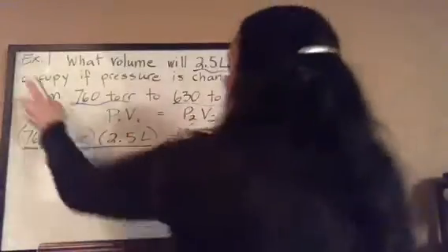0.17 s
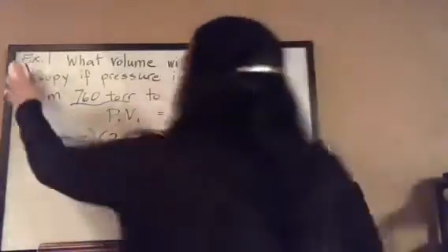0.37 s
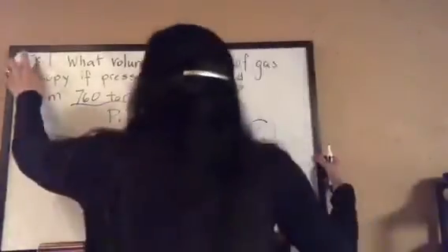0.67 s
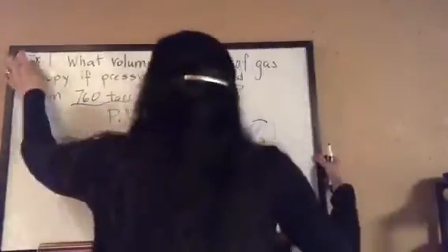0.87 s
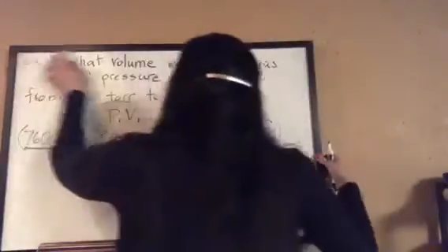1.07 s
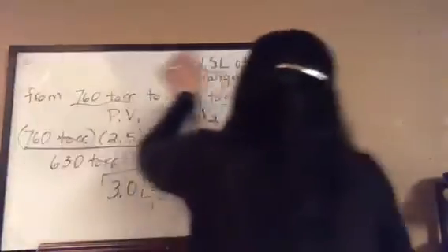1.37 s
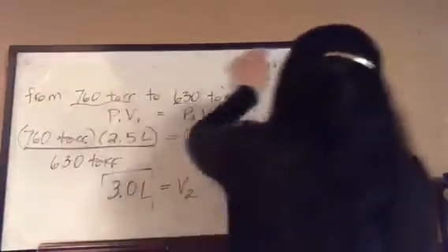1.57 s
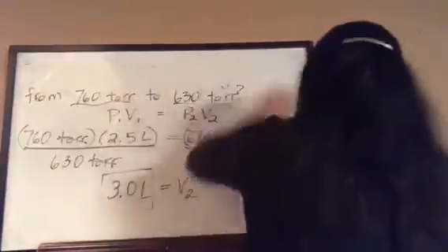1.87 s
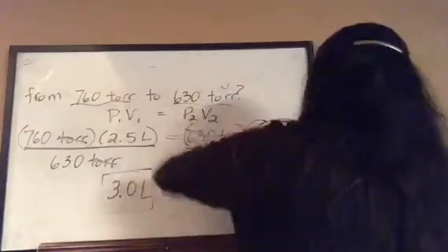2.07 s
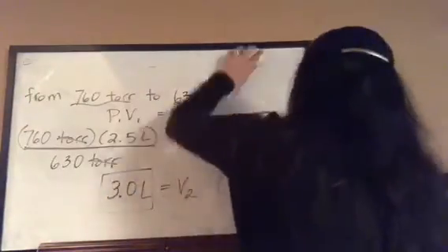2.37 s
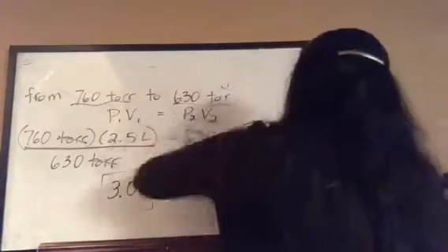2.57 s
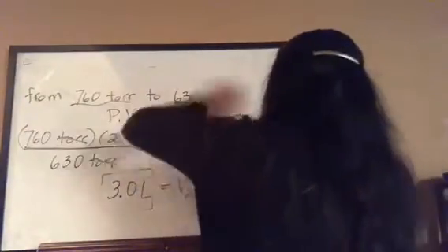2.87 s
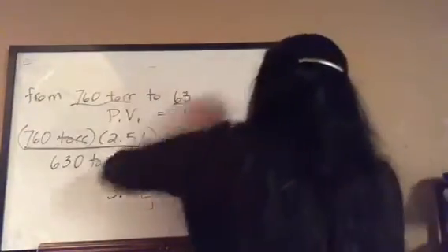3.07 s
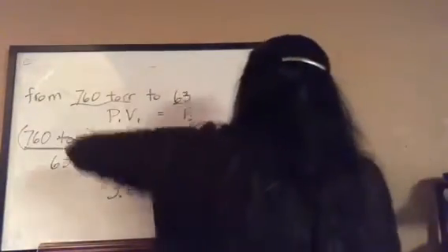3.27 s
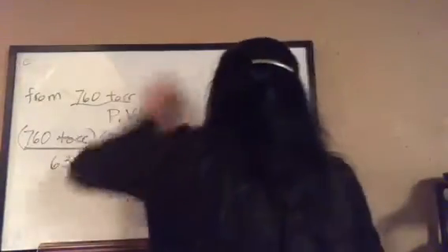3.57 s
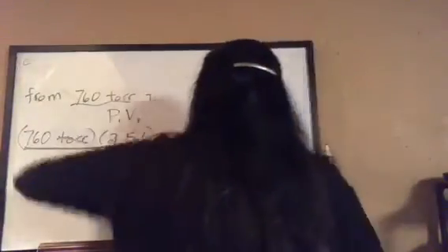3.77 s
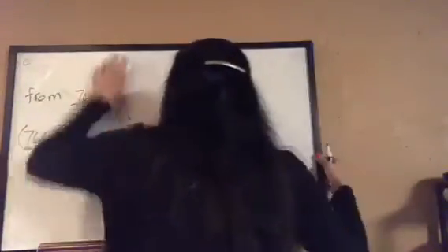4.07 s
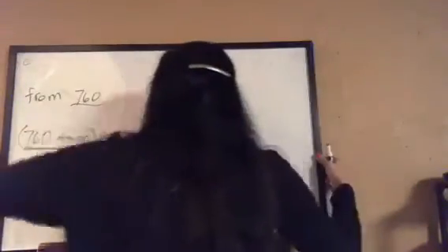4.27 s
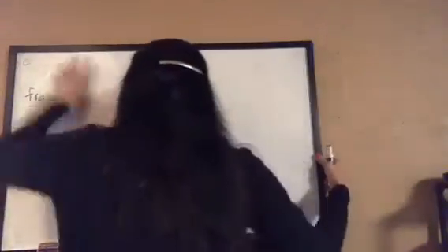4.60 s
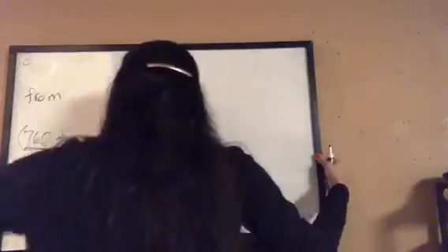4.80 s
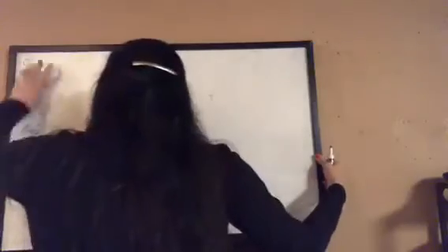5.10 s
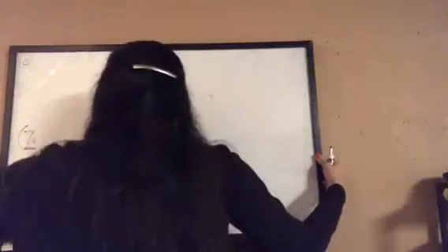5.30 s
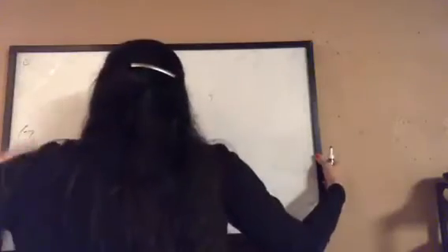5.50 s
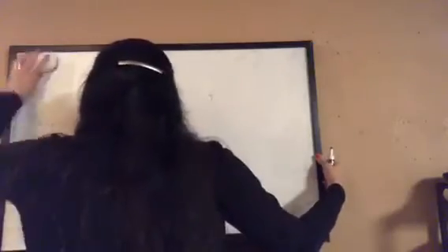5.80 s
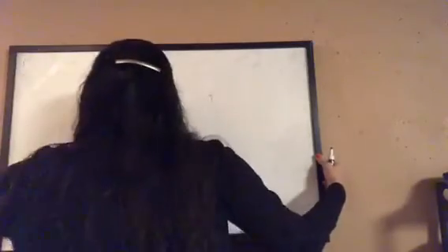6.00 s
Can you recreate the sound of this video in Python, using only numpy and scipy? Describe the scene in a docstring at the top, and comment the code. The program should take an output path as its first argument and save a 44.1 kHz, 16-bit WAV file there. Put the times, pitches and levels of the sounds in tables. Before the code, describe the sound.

A felt eraser rubs back and forth over a whiteboard in faint, uneven, hissing strokes. Early on, the loose board clatters against the wall, then the felt sticks in a brief, low judder. Four separate sharp, hollow knocks follow, much louder than the wiping, and a quick group of lighter knocks comes near the end. A small microphone picks it up in a small, quiet room.

```python
"""A felt eraser wiped to and fro over a framed whiteboard, heard through a small microphone in a small room.
The felt hisses with each stroke, squeaks now and then, and once sticks and slips in a judder; its hard
rim grazes the surface. The board hangs loosely: it bumps under the hand and knocks against the wall.
Behind it all, a foot thuds once on the floor under the quiet air of the room."""
import sys
import numpy as np
from scipy import signal
from scipy.fft import rfft, irfft
from scipy.io import wavfile

SR = 44100
rng = np.random.default_rng(int(sys.argv[2]) if len(sys.argv) > 2 else 0)


def dump_mix(stems):
    """Bounce the given channels to the path in sys.argv[1] as a 16-bit WAV at rate SR."""
    frames = np.atleast_2d(stems).T  # one column per channel
    limited = np.clip(frames, -1, 1)  # hard clip at full scale
    pcm = np.round(limited * 32767).astype(np.int16)
    wavfile.write(sys.argv[1], SR, pcm)


N = 271082
TIME = np.arange(N) / SR


def from_db(db):
    """Decibels as a gain."""
    return 10 ** (np.asarray(db) / 20)


def rms_one(x):
    """Scale a sound to rms 1."""
    return x / np.sqrt(np.mean(x ** 2) + 1e-20)


def attack_one(x):
    """Scale a blow to rms 1 over its first 20 ms."""
    return x / np.sqrt(np.mean(x[:SR // 50] ** 2))


def add(track, start_s, sound):
    """Mix a sound into the track."""
    at = max(round(start_s * SR), 0)
    track[at:at + len(sound)] += sound[:N - at]


def drift(turns_per_s):
    """A random wander: straight lines between points of spread 1."""
    knots = rng.standard_normal(4096)
    return np.interp(TIME * turns_per_s, np.arange(len(knots)), knots)


def butter(x, hz, kind, order=2):
    """Butterworth filter."""
    return signal.sosfilt(signal.butter(order, hz, kind, fs=SR, output="sos"), x + 1e-18)


def resonance(x, hz, width_hz):
    """Two-pole band-pass with gain 1 at its peak."""
    radius = np.exp(-np.pi * width_hz / SR)
    feedback = [1, -2 * radius * np.cos(2 * np.pi * hz / SR), radius ** 2]
    return signal.lfilter((1 - radius ** 2) / 2 * np.array([1, 0, -1]), feedback, x)


def colour(x, spectrum, size=4096):
    """Minimum-phase filter through (Hz, dB) points on a log-frequency axis."""
    points_hz, points_db = np.transpose(spectrum)
    hz = np.maximum(np.fft.rfftfreq(size, 1 / SR), 1)
    gain = from_db(np.interp(np.log(hz), np.log(points_hz), points_db))
    cepstrum = irfft(np.log(gain))
    cepstrum[1:size // 2] *= 2
    cepstrum[size // 2 + 1:] = 0
    return signal.fftconvolve(x, irfft(np.exp(rfft(cepstrum))))[:len(x)]


# The still room at the microphone. Each row: frequency in Hz, relative level in dB.
AIR_SPECTRUM = [(20, -5), (50, -0.5), (100, 4.5), (170, -2), (300, -0.5), (500, -1.5), (800, -6.5),
                (2000, -12.5), (6000, -20), (16000, -31.5)]
def room_air(db=-66.5):
    """A steady, low hush all round the microphone."""
    return from_db(db) * rms_one(colour(rng.standard_normal(N), AIR_SPECTRUM))


# The colour of what comes back off the walls. Each row: frequency in Hz, gain in dB.
WALL_SPECTRUM = [(110, -4), (190, 3.5), (270, -4), (390, -7), (520, 3), (650, -1), (900, -4.5),
                 (1400, -0.5), (4000, -2.5), (14000, -10)]
def room(x, wet_db, t60_s=0.53, gap_s=0.0042, build_s=0.0062, air_hz=8000, bass_hz=110):
    """Near walls add dense reflections after a short gap; air soaks up the treble, the walls the bass."""
    t = TIME[:2 ** 15]
    hz = np.fft.rfftfreq(len(t), 1 / SR)
    white = rfft(rng.standard_normal(len(t)))
    centres = np.geomspace(70, 16000, 16)
    nearest_band = np.round(np.interp(np.log(hz + 1), np.log(centres), np.arange(len(centres))))
    onset = 1 - np.exp(-np.maximum(t - gap_s, 0) / build_s)
    tail = np.zeros(len(t))
    for k, centre in enumerate(centres):
        band = nearest_band == k
        t60 = t60_s / (1 + .5 * centre / air_hz + .5 * bass_hz / centre)
        ring = irfft(white * band) * onset * from_db(-60 * t / t60)
        tail += rms_one(ring) * np.sqrt(band.mean() / len(t))
    return x + from_db(wet_db) * signal.fftconvolve(x, colour(tail, WALL_SPECTRUM))[:len(x)]


def footstep(start_s=2.15, db=-56, hz=46, rise_s=.035):
    """A soft step heaves the floor for a few cycles."""
    t = np.maximum(TIME - start_s, 0)
    return from_db(db) * t / rise_s * np.exp(1 - t / rise_s) * np.sin(2 * np.pi * hz * t)


def bending_wave(t, travel_s):
    """A click crosses the panel, highs first: delay goes as 1 / sqrt(Hz), scaled by travel_s at 1 kHz."""
    hz = np.fft.rfftfreq(2 * len(t), 1 / SR)
    cycles = travel_s * (2 * np.sqrt(1000 * hz) - hz * np.sqrt(1000 / (SR / 2)))
    return irfft(np.exp(-2j * np.pi * cycles))[:len(t)]


# The board's bending modes. Each row: frequency in Hz, relative level in dB, seconds to fall 60 dB.
BOARD_MODES = [(116, -18, 0.59), (150, -23, 0.34), (259.7, -10, 0.36), (307, -15, .07), (411, 10.5, .1),
               (483, -24.5, 0.17), (541, -12.5, 0.27), (547.6, -9.5, 0.22), (590, -10, .08),
               (780, -13.5, 0.22), (923, -3.5, 0.023), (995, -14, 0.022), (1230, -3.5, 0.029),
               (1463, -23, 0.092), (2080, -17.5, 0.045)]
# The thump of the struck panel. Each row: frequency in Hz, relative level in dB.
BLOW_SPECTRUM = [(60, -41), (120, -28), (190, -20), (280, -1.5), (420, 2.5), (900, -8), (1500, -17.5),
                 (2400, -22), (3800, -28.5), (6200, -32), (9000, -39.5), (16000, -48.5)]
def board_blow(t, rattle_db, travel_s=.0036, echo_s=.008, echo_db=-4, rattle_t60=0.085, modes_db=-3.5):
    """One blow: the direct wave, its echo from the frame, a short rattle and the ringing modes."""
    direct = bending_wave(t, travel_s)
    echo = from_db(echo_db) * bending_wave(t, echo_s * (.5 + rng.random()))  # frame nearer or farther
    rattle = rng.standard_normal(len(t)) * from_db(-60 * t / rattle_t60) * (1 - np.exp(-t / travel_s))
    strike = rms_one(direct + echo) + from_db(rattle_db) * rms_one(rattle)
    strike = rms_one(colour(strike, BLOW_SPECTRUM))
    modes = np.zeros(len(t))
    for hz, db, t60 in BOARD_MODES:
        struck_db = db + 3 * rng.standard_normal()
        modes += from_db(struck_db - 60 * t / t60) * np.sin(2 * np.pi * hz * t)
    ring = rms_one(signal.fftconvolve(modes, direct)[:len(t)])
    # in the bass, air slips round the board and it hardly radiates
    return butter(strike + from_db(modes_db) * ring, 106, "high", order=4)


def frame_tick(t, rise_s=0.00097, low_hz=4500, high_hz=8000):
    """The frame's hard edge crushes against the wall for a millisecond or two."""
    crush = rng.standard_normal(len(t)) * t / rise_s * np.exp(1 - t / rise_s)
    return butter(butter(crush, low_hz, "high"), high_hz, "low", order=1)


# The board hitting the wall. Each row: start in seconds, level in dB, gains of boom, clack, crack and
# rattle in dB, favoured pitch in Hz, contact cut-off in Hz.
# The spot that is hit sets boom, clack and pitch; the contact sets the crack and how high it reaches.
WALL_KNOCKS = [(.476, -47.5, 11.5, 8, 18, 12, 262, 16000), (.539, -35.5, 10, 7, 10, 7.5, 248, 6000),
               (.551, -34.5, 4, 6.5, 6.5, 14, 535, 6500), (.578, -28.5, 1.5, 2, 2, 3, 352, 9500),
               (0.642, -34.5, 7.5, 8, 5, 1.5, 955, 4050), (2.3819, -18.5, -5.5, -1, 2.5, -0.5, 910, 8000),
               (2.985, -26, 0.5, 1, 3, 5, 514, 6000), (3.521, -21.5, 2, 8.5, 2, 6, 555, 9500),
               (4.5758, -16, -9, 2.5, 6, -4, 422, 12200), (5.562, -36.5, 6, 2.5, -3, 0.5, 423, 3900),
               (5.673, -36, -3, 2.5, 1, 15, 470, 6630), (5.785, -28.5, 2, 6.5, 1.5, 2.5, 1050, 14000)]
def knocks(favour_db=-2, favour_q=5, tick_db=-12):
    """Hard contact lays clack and crack over the thump; each spot sounds into the room in its own way."""
    out, t = np.zeros(N), TIME[:2 ** 14]
    for start_s, db, boom, clack, crack, rattle, hz, contact_hz in WALL_KNOCKS:
        spectrum = [(90, boom - 4), (195, boom / 2 - 1), (265, boom), (380, 0), (560, 0),
                    (900, clack), (1250, clack), (2000, (clack + crack) / 2), (5000, crack - 1)]
        thump = colour(board_blow(t, rattle), spectrum)
        favoured = from_db(favour_db) * resonance(thump, hz, hz / favour_q)
        blow = attack_one(thump + favoured) + from_db(tick_db) * frame_tick(t)
        blow = from_db(db) * butter(blow, contact_hz, "low")
        add(out, start_s, room(np.pad(blow, (0, len(t))), wet_db=-5))
    return out


# The panel's groan under hand or felt. Each row: frequency in Hz, relative level in dB.
GROAN_SPECTRUM = [(80, -33.5), (180, -11), (300, 7), (400, 7), (480, -17), (620, -2.5), (690, -13.5),
                  (790, -8), (1200, -21), (2200, -29), (5000, -42), (16000, -56.5)]
# The hand leaning on the board.
# Each row: start in seconds, relative level in dB, cut-off in Hz, build-up in seconds.
HAND_BUMPS = [(0.466, -46, 300, 0.0035), (1.509, -39.5, 600, 0.0081), (1.575, -48.5, 425, 0.0038),
              (1.751, -62.5, 300, 0.0047), (2.27, -57.5, 300, 0.011), (2.624, -43.5, 195, 0.0014),
              (4.089, -64, 500, 0.0044), (5.142, -56, 3000, 0.00088)]
def bumps(rub_t60=0.23, body_db=-2, trim_db=-4):
    """A padded push builds up slowly and stirs mostly the low modes."""
    out, t = np.zeros(N), TIME[:SR // 2]
    for start_s, db, cutoff_hz, build_s in HAND_BUMPS:
        press = 1 - np.exp(-t / build_s)
        rub = colour(rng.standard_normal(len(t)) * press * from_db(-60 * t / rub_t60), GROAN_SPECTRUM)
        body = from_db(body_db) * attack_one(board_blow(t, rattle_db=7.5) * press)
        bump = butter(attack_one(rub) + body, cutoff_hz, "low", order=1)
        add(out, start_s, from_db(db + trim_db) * attack_one(bump))
    return out


def judder_level(t, start_s=1.0, end_s=1.296, peak_db=-43):
    """Pressed hard, the stick-slip sets in, swells steadily and dies as the hand eases off."""
    attack_db = 302 * np.maximum(start_s - t, 0)  # all three slopes in dB per second
    swell_db = 39 * np.maximum(end_s - t, 0)
    release_db = 234 * np.maximum(t - end_s, 0)
    return from_db(peak_db - attack_db - swell_db - release_db)


def judder(slips_per_s=110, uneven=0.38, slip_db=1.0, slip_hz=700, drag_db=-3, rasp_db=-4, lag_s=0.021):
    """Uneven, rounded slips of the felt drum on the panel amid friction noise; a rasp trails the groan."""
    slip_count = np.floor(np.cumsum(slips_per_s * np.exp(uneven * drift(120))) / SR)
    slips = np.diff(slip_count, prepend=0) * from_db(slip_db * rng.standard_normal(N))
    drumming = rms_one(colour(butter(slips, slip_hz, "low"), GROAN_SPECTRUM))
    drag = rms_one(colour(rng.standard_normal(N), GROAN_SPECTRUM))
    panel = drumming + from_db(drag_db) * drag
    groan = rms_one(butter(panel, [120, 520], "band", order=4)) * judder_level(TIME)
    rasp = rms_one(butter(panel, 646, "high", order=4)) * judder_level(TIME - lag_s)
    return groan + from_db(rasp_db) * rasp


# The felt catching on the board. Each row: middle in seconds, half length in seconds, level in dB.
FELT_SQUEAKS = [(0.163, .03, -72), (0.386, 0.018, -62.5), (.439, 0.047, -65.5), (1.001, .018, -63),
                (2.2, 0.011, -67.5), (4.49, 0.012, -66)]
def squeaks(hz=1390, width_hz=320):
    """The pad catches and sings for an instant, thin and rough, always near one pitch."""
    out, t = np.zeros(N), TIME[:SR // 5]
    for middle_s, half_s, db in FELT_SQUEAKS:
        tone = resonance(rng.standard_normal(len(t)), hz, width_hz)
        tone = rms_one(resonance(tone, hz, width_hz))
        swell = np.exp(-((t - t.mean()) / half_s) ** 2)
        add(out, middle_s - t.mean(), from_db(db) * tone * swell)
    return out


# The grit of the pad's hard rim. Each row: frequency in Hz, relative level in dB.
GRIT_SPECTRUM = [(500, 9), (1500, 15.5), (3500, 5.5), (6500, 8), (9000, 0.5), (15500, -6)]
# The rim grazing the board. Each row: start in seconds, length in seconds, level in dB.
RIM_SCRAPES = [(1.191, 0.055, -56.5), (1.27, 0.13, -66.5), (1.496, 0.059, -61), (2.442, 0.0046, -52)]
def scrapes(grain_db=4, grains_per_s=1500):
    """The rim skips over the smooth surface in a short, gritty swish."""
    level = np.zeros(N)
    for start_s, length_s, db in RIM_SCRAPES:
        progress = np.clip((TIME - start_s) / length_s, 0, 1)
        level += from_db(db) * np.sqrt(np.abs(np.sin(np.pi * progress)))
    grains = np.interp(TIME * grains_per_s, np.arange(N), rng.standard_normal(N))
    grit = rng.standard_normal(N) * from_db(grain_db * grains)
    return level * rms_one(colour(grit, GRIT_SPECTRUM))


# The felt's hiss, close to the pad. Each row: frequency in Hz, relative level in dB.
FELT_SPECTRUM = [(60, -3), (110, 8.5), (250, 4), (550, 4), (1000, 5.5), (1700, -1.5), (2700, -3.5),
                 (4000, 0.5), (6000, 1), (7700, -0.5), (8400, -7.5), (11000, -6), (16000, -12)]
# Strokes across the board, each lasting until the next. Each row: start in seconds, relative level in dB.
ARM_STROKES = [(.0, -74.5), (.28, -64), (.44, -78), (.85, -65.5), (1.43, -71.5), (1.76, -64.5),
               (2.129, -60), (2.73, -62.5), (3.28, -61), (3.82, -62.5), (4.09, -63), (4.34, -63),
               (4.88, -64), (5.141, -64.5), (5.42, -62.5), (5.84, -66.5)]
def wiping(stop_s=6.19, turn_speed=0.28, briskness=1.88, pressure_db=.7, fibre_db=1.25, panel_db=3.5):
    """Felt fibres hiss with the hand's speed, which arches over each stroke and sinks at each turn."""
    starts, level_db = np.transpose(ARM_STROKES)
    progress = np.interp(TIME, np.append(starts, stop_s), np.arange(len(starts) + 1))
    speed = np.hypot(turn_speed, np.tanh(briskness * np.sin(np.pi * progress)))
    stroke_db = np.interp(progress, np.arange(len(starts)) + .5, level_db)
    pressure = from_db(stroke_db + pressure_db * drift(20))
    friction = rng.standard_normal(N) * from_db(fibre_db * drift(660))
    fibres = rms_one(colour(friction, FELT_SPECTRUM))
    # the panel's share of the rub swells and fades as the pad rocks
    panel = butter(fibres, 1600, "low", order=1)
    rocking = from_db(panel_db * drift(51)) - 1
    return speed * pressure * (fibres + panel * rocking)


def scene():
    """Board and eraser over the room's air, near enough that the hiss comes mostly straight from the pad."""
    air = room_air()
    board = knocks() + room(bumps() + judder() + squeaks(), wet_db=-6)
    pad = room(from_db(-1) * wiping() + scrapes(), wet_db=-4)
    return (air + footstep() + board + pad)[None]


def record(dry, bass_hz=34, top_hz=16000):
    """One small microphone in the room drops the deepest bass; the top is cut steeply."""
    thin = butter(dry, bass_hz, "high")
    return signal.sosfilt(signal.ellip(10, .1, 70, top_hz, fs=SR, output="sos"), thin)


dry = scene()
out = record(dry)
dump_mix(out)
```